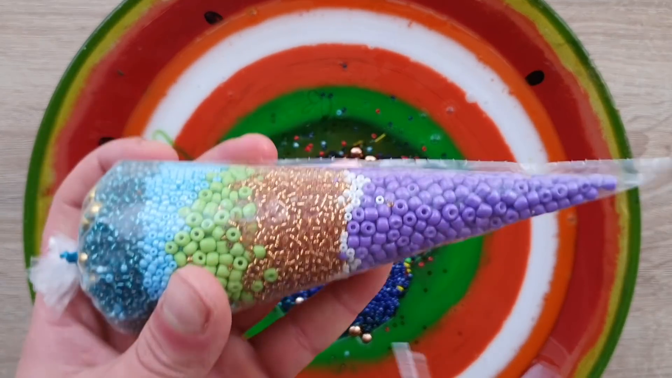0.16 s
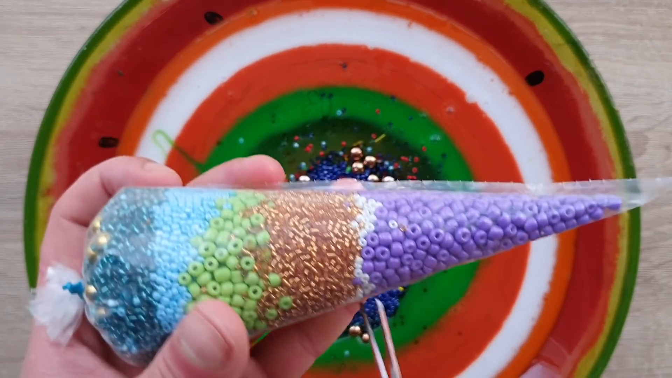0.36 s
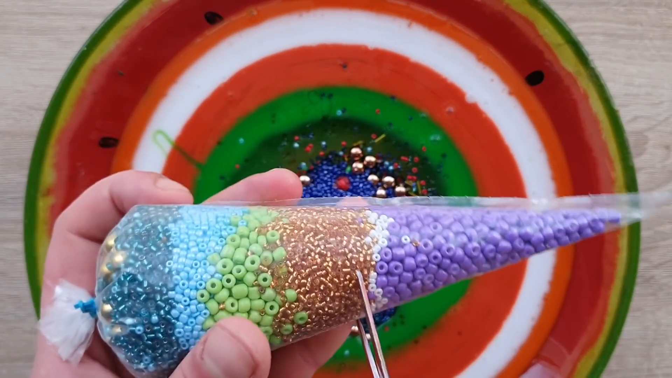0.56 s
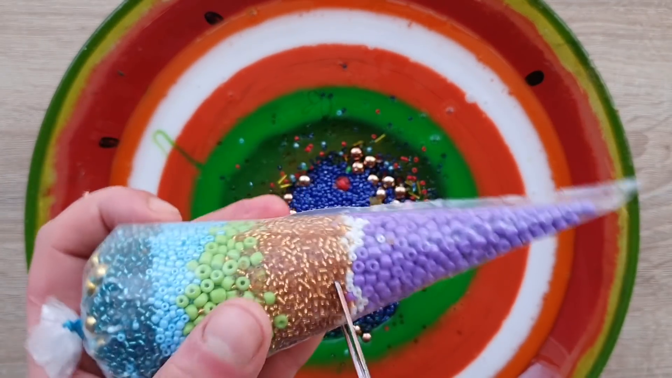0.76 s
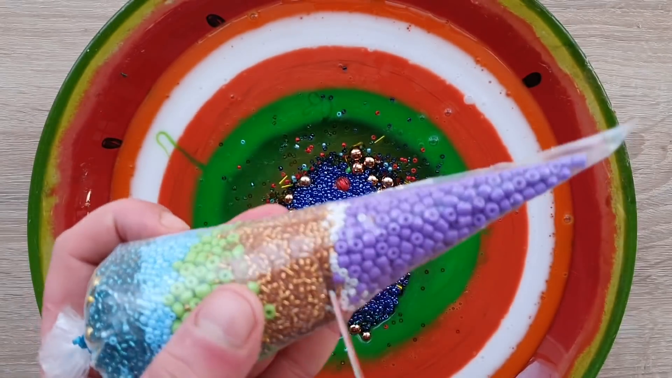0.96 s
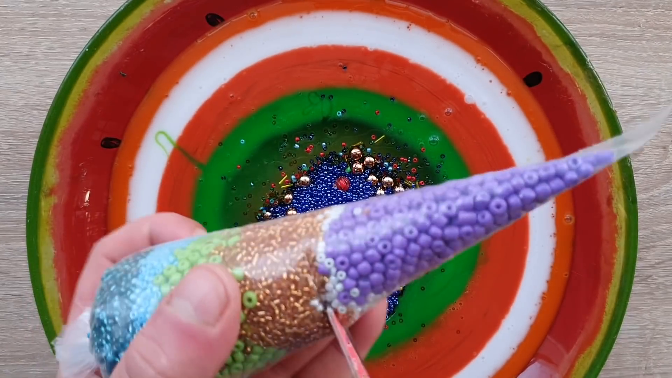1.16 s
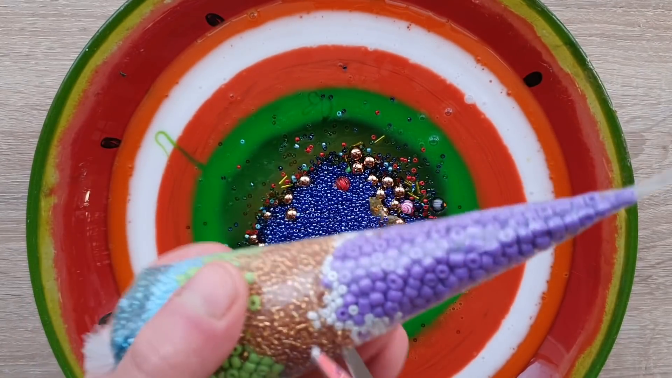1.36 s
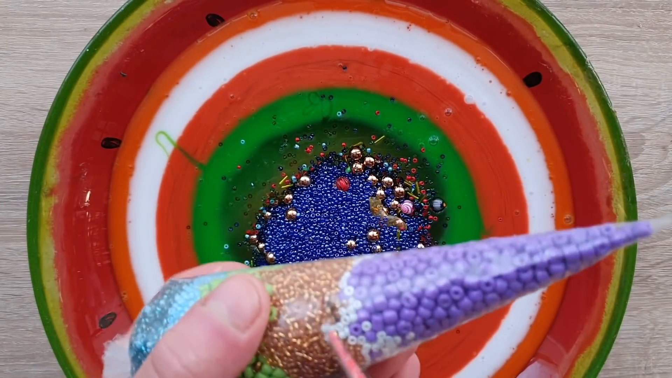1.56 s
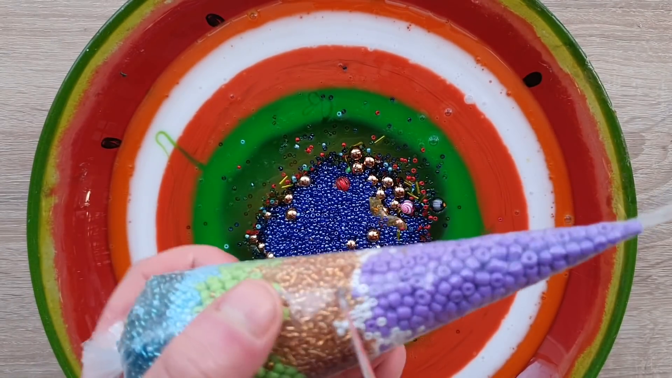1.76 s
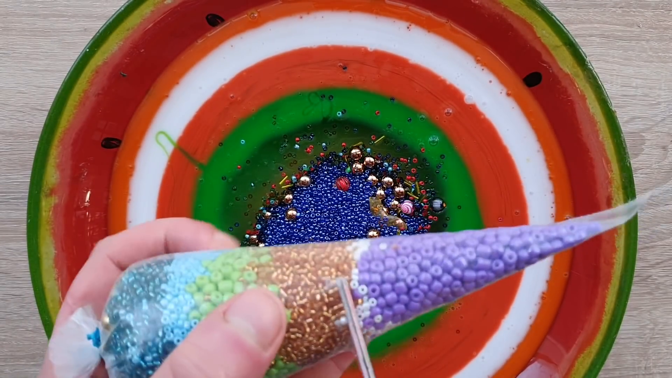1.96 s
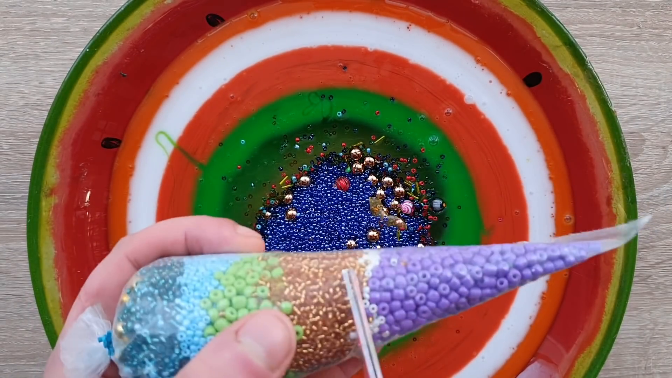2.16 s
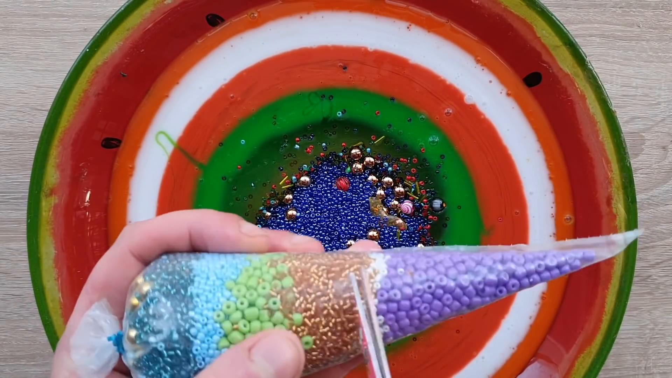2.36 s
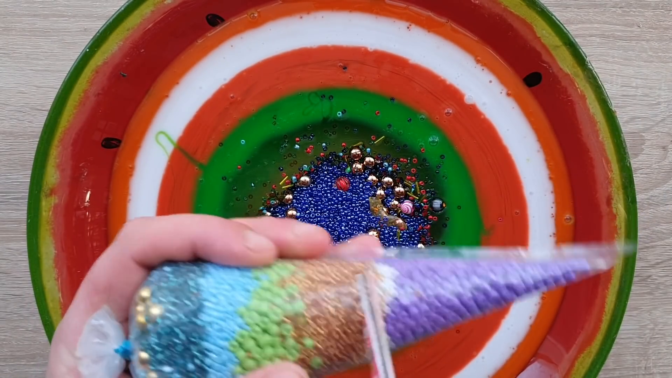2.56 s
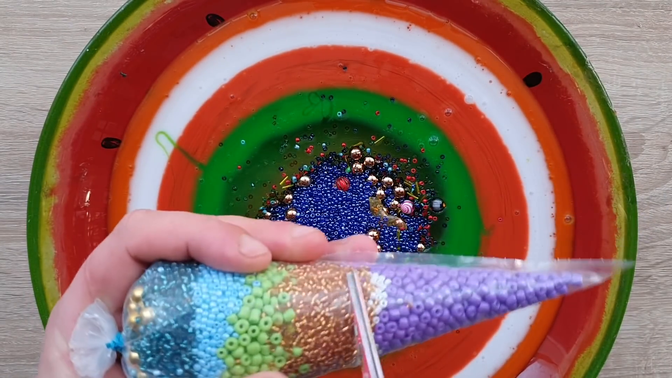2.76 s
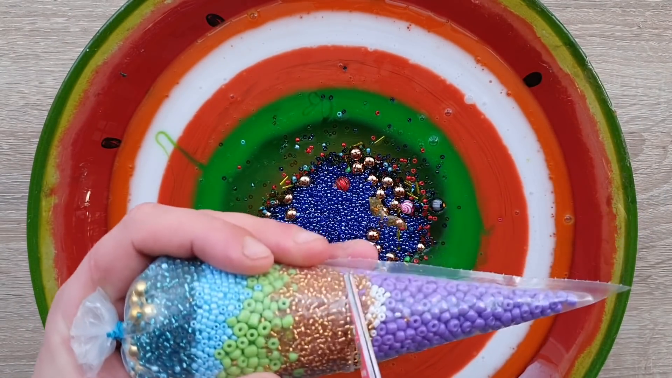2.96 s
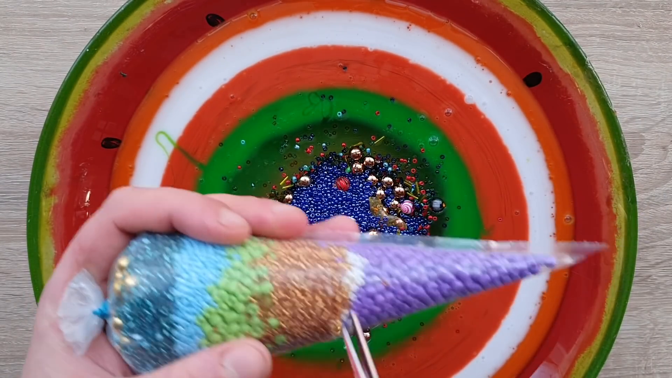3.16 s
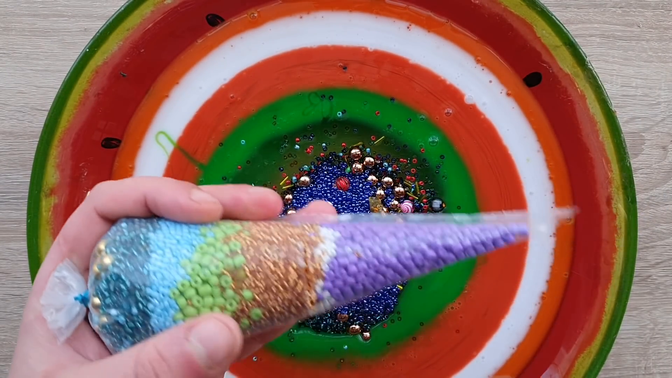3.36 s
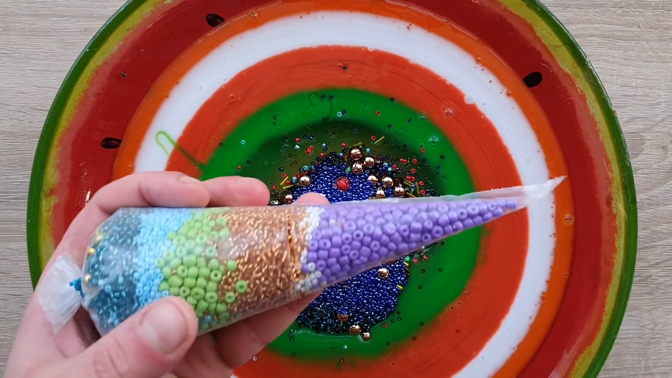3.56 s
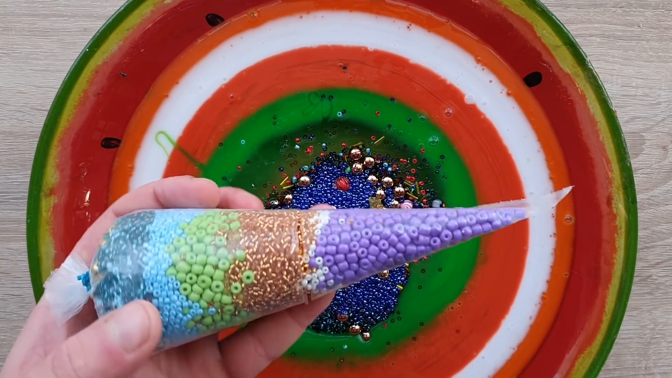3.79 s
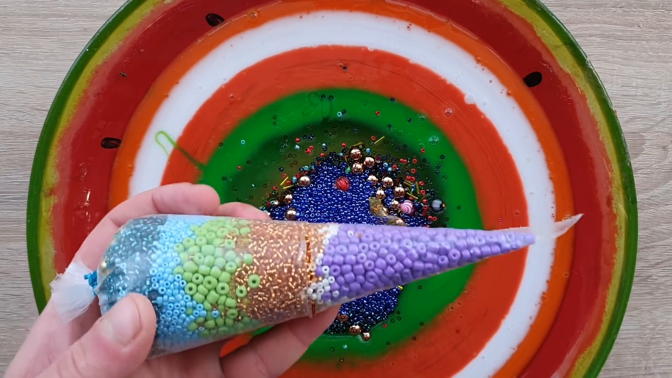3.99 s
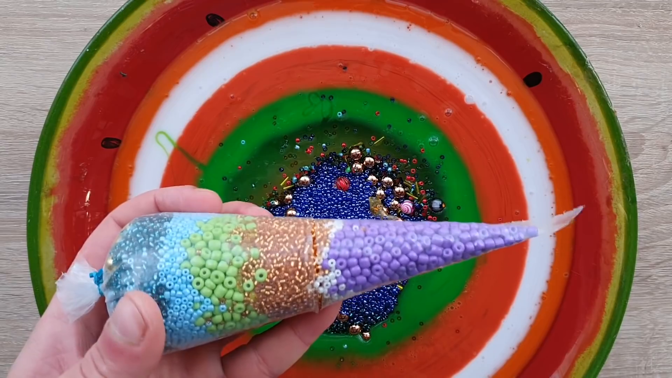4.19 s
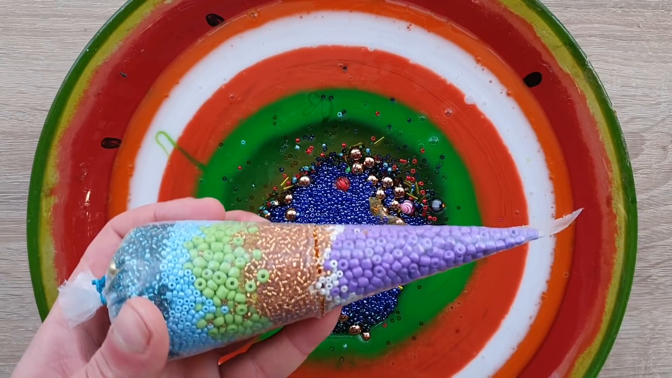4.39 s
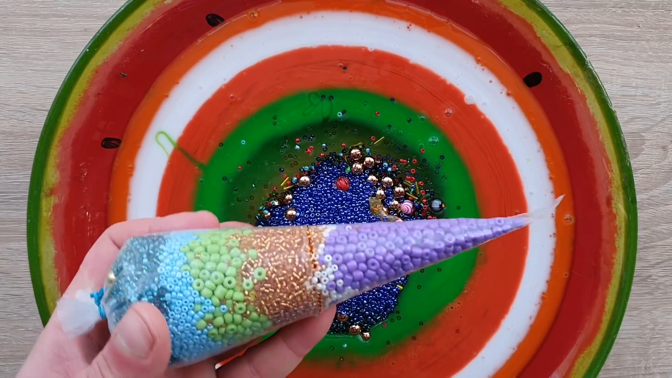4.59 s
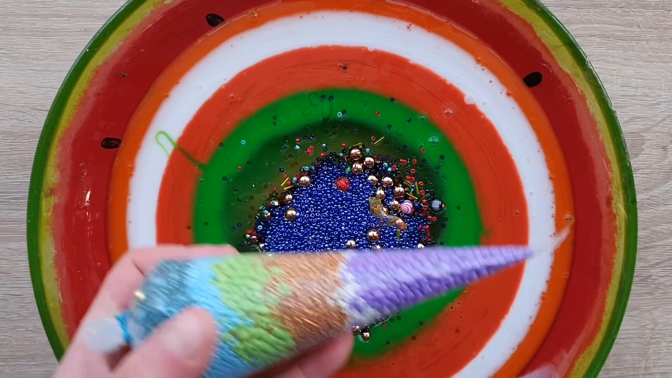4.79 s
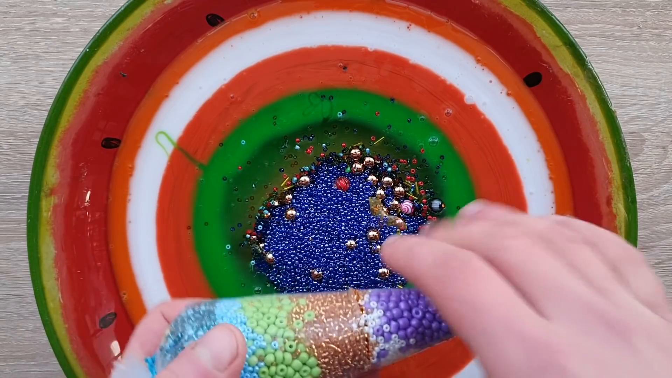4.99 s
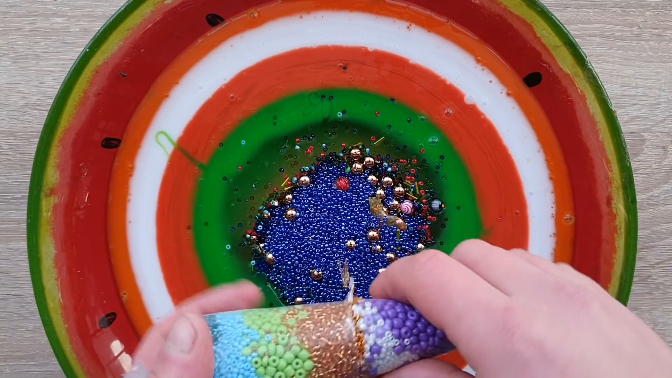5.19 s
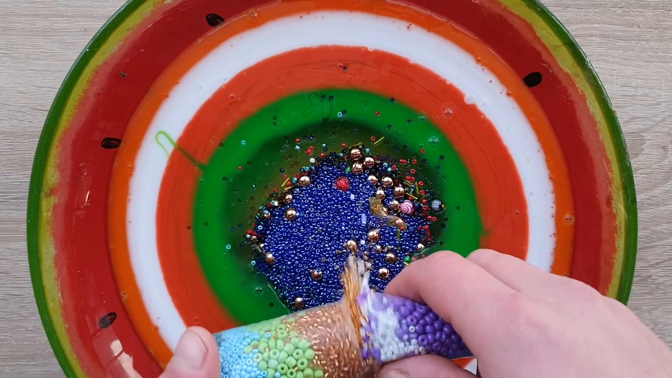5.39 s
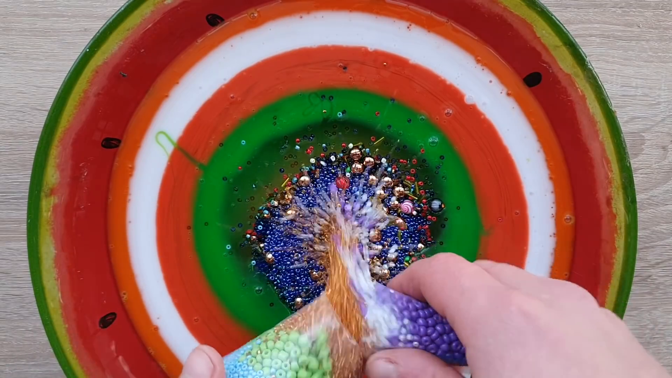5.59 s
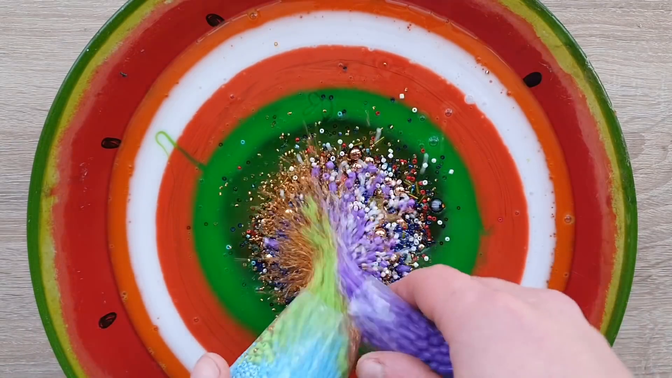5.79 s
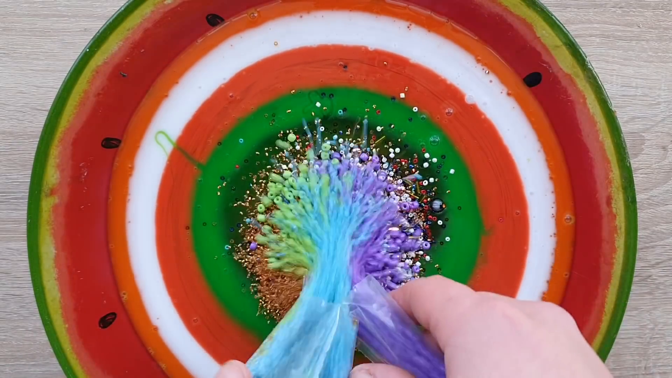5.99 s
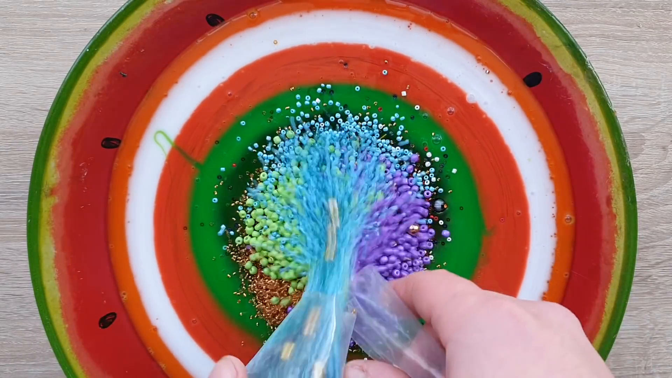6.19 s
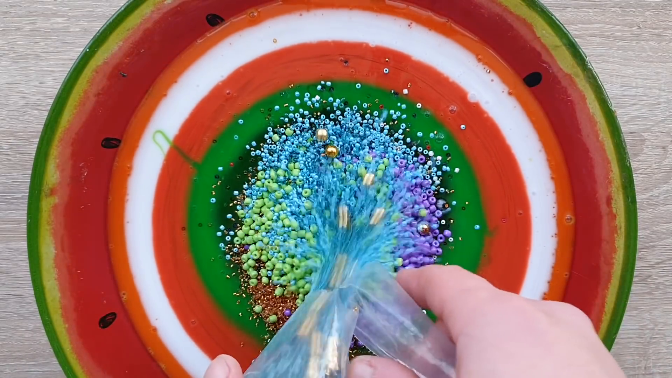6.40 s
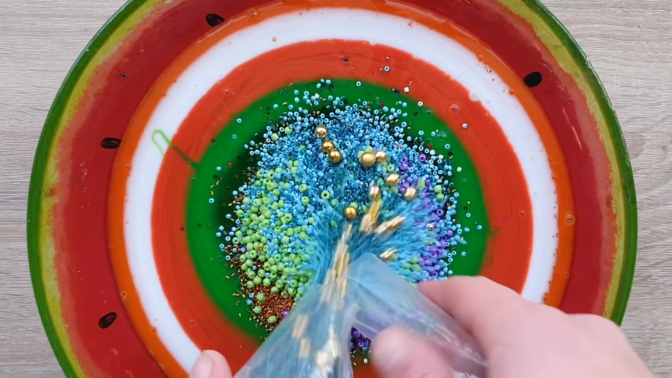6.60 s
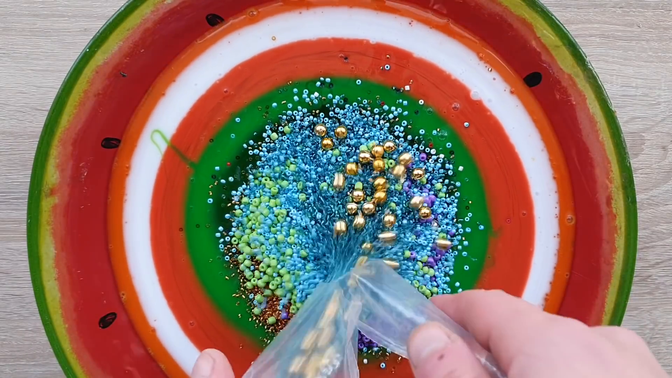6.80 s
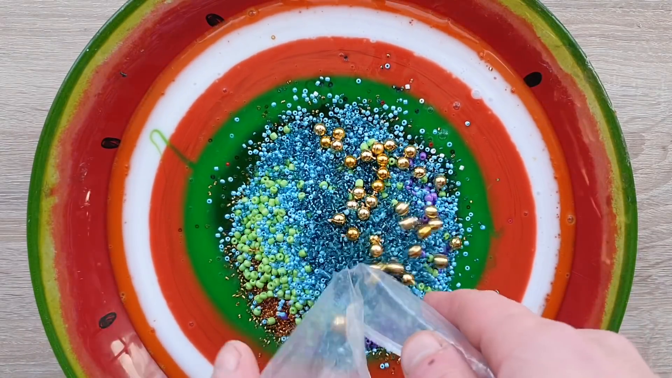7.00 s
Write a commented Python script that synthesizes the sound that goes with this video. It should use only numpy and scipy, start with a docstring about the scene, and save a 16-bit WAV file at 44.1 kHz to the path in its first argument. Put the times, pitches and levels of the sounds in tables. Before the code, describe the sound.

A close, dry stereo scene in a small quiet room, with faint hiss and soft low rumble from moving hands. At first there are barely audible crinkles of plastic. From about 0.65 to 3.4 seconds, small scissors snip a taut bag of beads in irregular short strokes: tiny tearing crackles, sharp snaps, a little blade ring and soft finger rubs, strongest around 0.9 seconds. After a pause, at 4.0 seconds the steel tips clack brightly on a wooden table, with a low thump; the handles settle with duller knocks between 4.2 and 4.5. Fingers slide softly over film near 5. From 5.2 beads trickle softly onto slime, then surge with a loud snap at 5.55 into a dense hiss and patter, peaking near 5.85 with small clinks. The stream gradually thins; from about 6.2, large pearls add dull rounded knocks, bunching near 6.75 and ending around 7 seconds.

```python
"""Cutting open a bag of beads

Small scissors snip along a plastic cone bag packed with beads, then are laid on a wooden table. Beads pour
onto slime in a bowl: a hiss and a patter on the growing heap, then the duller knocks of large pearls.
Film and beads are showers of filtered noise bursts and short rings; the scissors and table are struck modes.
A faint hiss, a low rumble, a wall echo and a diffuse tail place it all in a small room, close by."""
import sys
import numpy as np
from scipy import signal
from scipy.fft import rfft, irfft
from scipy.io import wavfile
from scipy.ndimage import uniform_filter1d

SR = 44100
rng = np.random.default_rng(int(sys.argv[2]) if len(sys.argv) > 2 else 0)


def wrap_up_sound(samples):
    """Save the sound to the file named by the first command line argument, as 16-bit audio."""
    columns = np.atleast_2d(samples).T
    # keep every value between -1 and 1, then stretch to whole-number steps
    tamed = np.clip(columns, -1, 1)
    steps = np.round(tamed * 32767).astype(np.int16)
    wavfile.write(sys.argv[1], SR, steps)


N = 310905

# how alike the two microphones hear a sound: f/Hz, left-right correlation
LIKENESS = [(60, 0.9), (600, 0.8), (1200, 0.66), (2500, 0.36), (5000, 0.13), (10000, 0.031)]
# strokes of the blades through the film: t/s, length/s, mid-stroke level/dB, swell from start to end/dB,
# resonance of the packed bag/dB, ring of the blades/dB
CUTS = [(0.657, 0.16, -68, 9, 2.5, 7.5), (0.737, 0.024, -60, -5, 11, -1),
        (0.855, 0.024, -58.5, -16, 7.5, 5), (0.879, 0.062, -49.5, -17.5, 12, -2),
        (0.942, 0.18, -59, -7, 11.5, 9.5), (1.196, 0.19, -58, 6, 3, -0.5),
        (1.468, 0.087, -61.5, -2, 6.5, 7), (1.616, 0.052, -61, -7.5, 0, 0), (1.695, 0.13, -67, 3, -1, -3),
        (1.9, 0.066, -54.5, -8.5, 7, 5), (2.175, 0.057, -66, 4, 2, 3), (2.276, 0.019, -56.5, -3, -0.5, 2.5),
        (2.428, .055, -51.5, -10.5, 0, 9.5), (2.513, 0.064, -63, 8, 3, 4), (2.66, 0.092, -65, -3.5, -5, 11),
        (2.771, 0.019, -57, 0, -2.5, 6.5), (2.941, 0.077, -58.5, 3.5, -15, 4.5),
        (3.335, 0.081, -70, -5, -7, -13)]
# strength of the stream leaving the bag, before the make-up gain in pour(): t/s, level/dB
FLOW = [(5.0, -95), (5.29, -57), (5.43, -47.5), (5.6, -45.5), (5.84, -37.5), (6.12, -41.5), (6.5, -46),
        (6.85, -49.5), (7.05, -60.5)]
HEAP_FROM_S, HEAP_BUILT_S = 5.21, 5.715  # the first beads land softly in slime, later ones on other beads


def amp(db):
    """Decibels to gain."""
    return 10 ** (np.asarray(db) / 20)


def read(points, hz):
    """Reads a spectrum table on a log-frequency axis."""
    f, value = np.transpose(points)
    return np.interp(np.log(hz + 1), np.log(np.abs(f) + 1), value)


def follow(rows):
    """Turns a curve of (t/s, level/dB) into a gain for every sample."""
    return amp(np.interp(np.arange(N) / SR, *np.transpose(rows)))


def envelope(s, length, attack_s, release_s):
    """A gain that rises at time s, holds, and dies away after the length."""
    t = np.arange(N) / SR - s
    return np.clip(t / attack_s, 0, 1) * np.exp(-np.maximum(t - length, 0) / release_s)


def add(mix, s, sound):
    """Mixes a sound in at time s."""
    part = mix[:, max(round(s * SR), 0):][:, :sound.shape[-1]]
    part += sound[..., :part.shape[1]]


def unit(x):
    """Scales a stereo sound so that its middle has energy 1."""
    return x / np.sqrt(np.sum(x.mean(0) ** 2) + 1e-20)


def blow(x, db):
    """Gives a short sound the energy of 3 ms at this level."""
    return unit(x) * amp(db) * np.sqrt(.003 * SR)


def lean(x, left_db):
    """Moves a sound to the left; one that is equal in both channels keeps its middle level."""
    gains = amp([[left_db / 2], [-left_db / 2]])
    return x * gains / gains.mean()


def colour(x, points, size=2048):
    """Causal (minimum-phase) filter with the given spectrum."""
    log_gain = np.log(amp(read(points, abs(np.fft.fftfreq(size, 1 / SR)))))
    taps = np.fft.ifft(np.exp(np.conj(signal.hilbert(log_gain)))).real
    return signal.oaconvolve(x, taps[None, :size // 2], axes=1)[:, :x.shape[1]]


def band(x, hz, width_hz):
    """The part of a sound that one resonance passes."""
    return signal.lfilter(*signal.iirpeak(hz, hz / width_hz, fs=SR), x)


def pair_noise(size):
    """White noise at two microphones: alike in the bass, unrelated in the treble, the left a little early."""
    a, b = rfft(rng.standard_normal((2, size)))
    hz = np.fft.rfftfreq(size, 1 / SR)
    same = np.clip(read(LIKENESS, hz), -1, 1)
    lag = np.exp(-2j * np.pi * hz * 2.5 / SR)  # 2.5 samples
    right = same * lag * a + np.sqrt(1 - same ** 2) * b
    return irfft(np.array([a, right]), size)


def tick(fade_s, size=1024):
    """One contact: a noise burst that fades exponentially."""
    return unit(pair_noise(size) * np.exp(-np.arange(size) / SR / fade_s))


def ring(hz, fade_s, size=1024):
    """One damped resonance that builds up within a cycle, reaching the right microphone 2 samples later."""
    t = np.arange(size) / SR
    late = np.maximum(t - np.array([[0], [2 / SR]]), 0)
    build = 1 - np.exp(-(2 * hz * late) ** 2)
    return unit(np.sin(2 * np.pi * hz * late) * np.exp(-late / fade_s) * build)


def grains(per_s, spread_db, fade_s, points, count=20):
    """A shower of contacts of uneven size, from count different places, at rms 1."""
    size = amp(spread_db * np.minimum(rng.exponential(1, N), 4)) * rng.choice([-1, 1], N)
    # dividing by the root of the rate keeps the level even while the density changes
    clicks = size * (rng.random(N) < per_s / SR) / np.sqrt(per_s)
    place = rng.integers(0, count, N)
    shower = np.zeros((2, N))
    for k in range(count):
        here = (clicks * (place == k))[None]
        shower += signal.oaconvolve(here, tick(fade_s, size=512), axes=1)[:, :N]
    return unit(colour(shower, points)) * np.sqrt(N)


def modes(table, size=20000):
    """The ring of a struck object; each blow finds slightly different mode strengths and pitches."""
    detune = 0.0091  # each contact loads the object differently and shifts its modes by about this share
    t = np.arange(size) / SR
    out = np.zeros((2, size))
    for hz, db, t60 in table:
        # a phase gap between the channels gives each mode its left-right correlation
        gap = np.arccos(np.clip(read(LIKENESS, hz), -1, 1)) * rng.choice([-1, 1])
        phase = gap * np.array([[-.5], [.5]])
        shifted = hz * (1 + detune * rng.standard_normal())
        decay = amp(db + 1.5 * rng.standard_normal() - 60 * t / t60)
        out += decay * np.sin(2 * np.pi * shifted * t + phase)
    return unit(out)


def background():
    """Faint steady hiss, and a low rumble that rises when the hands move and as the bowl fills."""
    # spectra of the hiss, the rumble and the deep boom: f/Hz, level/dB
    hiss_colour = [(120, -20), (200, -9.5), (450, -12.5), (1000, -17.5), (2200, -17), (3500, -19.5),
                   (5000, -21.5), (6600, -13.5), (7500, -24.5), (12000, -24.5), (16000, -39)]
    rumble_colour = [(15, -20), (30, -4.5), (52, -4.5), (66, 7), (82, -11), (98, 0), (115, -6),
                     (170, -17.5), (300, -32.5), (800, -63)]
    boom_colour = [(15, -27), (30, -14), (44, -4), (52, 2.5), (60, -6), (80, -15), (200, -46), (800, -83.5)]
    # movements of the hands: t/s, length/s, rumble level/dB, deep boom level/dB
    handling = [(-.1, 0.63, -68, -66.5), (0.844, 0.1, -62.5, -61.5), (1.266, 0.067, -61.5, -59.5),
                (2.128, 0.61, -65, -61.5), (2.745, 2.05, -68.5, -74.5), (3.938, 0.16, -59, -74)]
    hiss_db, resting_db, pour_db = -83.5, -76.5, -54.5
    pour_from_s, pour_rise_s = 4.98, 1

    hiss = unit(colour(pair_noise(N), hiss_colour)) * amp(hiss_db)
    filling = amp(pour_db) * np.clip((np.arange(N) / SR - pour_from_s) / pour_rise_s, 0, 1)
    level, deep = np.hypot(amp(resting_db), filling), 0
    for s, length, db, boom_db in handling:
        move = envelope(s, length, attack_s=0.15, release_s=0.079)
        level = np.hypot(level, amp(db) * move)
        deep = np.hypot(deep, amp(boom_db) * move)
    rumble = unit(colour(pair_noise(N), rumble_colour, size=16384)) * level
    boom = unit(colour(pair_noise(N), boom_colour, size=16384)) * deep
    return (lean(hiss, left_db=2.5) + rumble + lean(boom, left_db=5.5)) * np.sqrt(N)


def snap(db, hz, ring_db):
    """Taut film gives way or a bead jumps: a crack and a brief ring; the stronger the ring, the shorter the crack."""
    # spectrum of the crack: f/Hz, level/dB
    crack_colour = [(200, -21), (450, -26), (700, -11), (1100, -11), (1600, -4), (3500, -1), (7000, 4),
                    (8000, -0.5), (16000, -5.5)]
    crack = unit(colour(tick(fade_s=0.0065 / (1 + 2 * amp(ring_db))), crack_colour))
    return blow(crack + amp(ring_db) * ring(hz, fade_s=3 / hz), db)


def snaps():
    """Loud snaps, smaller ones scattered through every stroke, and faint crinkles under the grip."""
    # the loudest snaps of film and beads: t/s, level over 3 ms/dB, ring f/Hz, ring over crack/dB
    loud_snaps = [(0.17, -79, 4320, 1), (0.395, -72, 3060, -15), (0.5997, -63, 6100, -6),
                  (0.668, -71, 6940, -4), (0.7382, -55, 4730, 0), (0.753, -47, 3140, -12),
                  (.858, -48, 1520, -0.5), (0.8812, -45.5, 3240, -6), (0.9, -34.5, 3370, -18),
                  (0.9382, -34.5, 3360, -11.5), (0.979, -46.5, 3200, -31), (1.0183, -44.5, 6400, -7),
                  (1.0391, -44, 3050, -14), (1.2783, -49.5, 3080, -2), (1.379, -50.5, 3020, 10),
                  (1.4682, -41, 3250, 4.5), (1.4875, -45, 6600, -18), (1.5135, -48, 3210, -18),
                  (1.7671, -49, 6700, -23), (1.811, -51.5, 6740, -9), (1.931, -53, 3466, -1),
                  (1.9624, -49, 2300, -5), (2.183, -49, 6500, -11), (2.2764, -51, 6400, 1),
                  (2.335, -56, 7110, -2), (2.442, -48.5, 6360, -28), (2.5088, -48.5, 6300, -19),
                  (2.5798, -48.5, 6000, -11), (2.6775, -45.5, 7060, -0.5), (2.775, -49.5, 6550, -6),
                  (2.946, -54.5, 6440, 2), (3.24, -71, 7100, -11), (3.3568, -45.5, 5540, -10),
                  (5.16, -58.5, 6700, -11), (5.2016, -55.5, 9200, 4), (5.5477, -24, 3450, -4.5),
                  (5.7844, -30.5, 5840, 6), (5.98, -31, 3400, 0), (6.009, -25, 3420, 4),
                  (6.156, -32.5, 3460, 2), (6.8548, -37.5, 2820, 3.5), (6.9008, -38, 3470, -1)]
    small_per_s, small_db = 30, 0.5  # during a stroke; level over that of the stroke
    crinkles_per_s, loudest_crinkle_db, held_until_s = 5, -86, 2.6  # while the bag is gripped for cutting

    out = np.zeros((2, N))
    for s, db, hz, ring_db in loud_snaps:
        add(out, s, snap(db, hz, ring_db))
    for s, length, db, swell_db, _, _ in CUTS:
        for when, pitch in rng.random((round(small_per_s * length), 2)):
            level_db = db + swell_db * (when - .5) + small_db
            add(out, s + when * length, snap(level_db, hz=3300 * 2 ** pitch, ring_db=-10.5))
    for when, pitch, size in rng.random((round(crinkles_per_s * held_until_s), 3)):
        crinkle = snap(loudest_crinkle_db - 10 * size, hz=3300 * 2 ** pitch, ring_db=-11.5)
        add(out, when * held_until_s, crinkle)
    return lean(out, left_db=5.0)


def rubbing():
    """Fingers slide over the film: a dense shower of contacts makes a soft hiss that swells and fades."""
    # slides of the fingers: t/s, length/s, peak level/dB
    rubs = [(0.516, 0.093, -76.5), (1.1, 0.14, -71.5), (1.988, 0.1, -69.5), (2.124, 0.066, -74.5),
            (2.33, 0.08, -77), (3.707, .14, -81), (4.873, 0.45, -72)]
    # spectrum of the sliding: f/Hz, level/dB
    rub_colour = [(300, -20), (1500, -9), (2600, -10), (4200, -0.5), (5500, 1.5), (6500, 5.5), (7800, -1.5),
                  (16000, -13.5)]
    t = np.arange(N) / SR
    pressure = np.zeros(N)
    for s, length, db in rubs:
        pressure += amp(db) * np.sin(np.pi * np.clip((t - s) / length, 0, 1))
    slide = grains(per_s=21000, spread_db=6.5, fade_s=0.00067, points=rub_colour)
    return lean(slide * pressure, left_db=7.5)


def cutting():
    """Each push of the blades tears the film in an uneven run of tiny crackles."""
    # spectrum of the tearing film: f/Hz, level/dB
    film_colour = [(150, -12.5), (430, -20.5), (650, -11), (1150, -14.5), (1600, -6), (2600, -2.5),
                   (3200, 0), (4700, -2), (6700, 1), (7700, -6), (10000, -3), (16000, -7.5)]
    attack_s, release_s = 0.0074, 0.0064
    approach_s, approach_db = 0.027, -15.5  # the blades graze the film just before they bite

    t, push = np.arange(N) / SR, np.zeros(N)  # push sums the strokes as power
    for s, length, db, swell_db, _, _ in CUTS:
        progress = np.clip((t - s) / length, 0, 1)
        graze = amp(approach_db) * envelope(s - approach_s, approach_s, approach_s, attack_s)
        bite = envelope(s, length, attack_s, release_s)
        push += (amp(db + swell_db * (progress - .5)) * (graze + bite)) ** 2
    slip = uniform_filter1d(rng.standard_normal(N), 300)  # the blades catch and slip every few milliseconds
    stick = amp(2.6 * slip / slip.std())
    crackle = grains(per_s=2200, spread_db=2.8, fade_s=.0007, points=film_colour)
    return lean(crackle * np.sqrt(push) * stick, left_db=3.5)


def bag():
    """A deep bite wakes the packed beads behind the film; a shallow one leaves the blades ringing."""
    x = cutting() + snaps()
    # resonance gains glide from the middle of one stroke to the next
    packed = follow([(s + length / 2, bag_db) for s, length, _, _, bag_db, _ in CUTS])
    ringing = follow([(s + length / 2, ring_db) for s, length, _, _, _, ring_db in CUTS])
    body = band(band(x, hz=720, width_hz=2700), hz=695, width_hz=1700)
    body += 0.5 * band(x, hz=3250, width_hz=540)
    body += .7 * band(x, hz=190, width_hz=200)
    blades = 1.3 * band(x, hz=1660, width_hz=130)
    blades += 1.3 * band(x, hz=980, width_hz=80)
    blades += .7 * band(x, hz=2590, width_hz=130)
    return x + (packed - 1) * body + (ringing - 1) * blades + rubbing()


def scissors():
    """The steel tips chatter on the table and ring; then the handles drop flat with duller, wooden knocks."""
    # the scissors meet the table: t/s, steel level before a 4 dB cut/dB, hardness (treble limit) f/Hz,
    # wooden knock level/dB, its pitch f/Hz, table thump level before a 3 dB lift/dB,
    # chatter fade/s, longest ring t60/s
    knocks = [(3.9779, -32, 8500, -54, 860, -51, 0.0012, .3),
              (3.9947, -33.5, 8400, -50, 860, -46, 0.0022, 0.58),
              (4.02, -41, 6000, -58, 860, -48.5, 0.023, 0.14),
              (4.056, -42, 5500, -57, 860, -56, .0078, 0.12),
              (4.2383, -54, 1300, -48.5, 1010, -91, .0035, .2),
              (4.275, -58, 1400, -61, 980, -91, .012, .15), (4.302, -65, 1000, -55, 910, -85, .009, .04),
              (4.34, -74, 800, -61, 800, -86, .006, .04), (4.399, -51, 1100, -45.5, 850, -71, 0.0044, .02),
              (4.405, -49, 4000, -45, 845, -60, .008, .012),
              (4.4594, -47, 2820, -39.5, 858, -64, .004, .012)]
    # resonances of the scissors, then of the table top: f/Hz, level/dB, t60/s
    scissor_modes = [(890, -7, 0.1), (1050, -3, .5), (1230, -9, 0.056), (2030, 0, 0.092), (2203, 1.5, .1),
                     (2400, -10, 0.037), (3190, -1, 0.2), (3270, 0, .22), (3390, 2, .06), (4630, 4, 0.0093),
                     (4900, -2, 0.07), (5330, 3, .03), (6600, 16.5, 0.016)]
    table_modes = [(72, -28, 0.54), (119.7, 0.5, 0.15), (197, 2, 0.13), (234, 0, 0.15), (367, -5.5, 0.12)]
    # spectrum of the scraping steel: f/Hz, level/dB
    clatter_colour = [(150, -12), (450, -25), (600, -18.5), (850, 10), (1250, 1), (1600, -14), (2200, 5.5),
                      (2800, -9.5), (3400, 5.5), (4100, -10), (4800, 4), (6000, -8.5), (7000, -2.5),
                      (16000, -10.5)]
    # spectrum of a wooden knock: multiple of its pitch, level/dB
    wood_colour = [(.2, -15), (.55, -12), (.72, -12), (1, 1.5), (1.16, -7), (1.32, -6), (1.7, -15),
                   (2.2, -16), (2.45, -9), (2.85, -19), (3.7, -19), (4.9, -33), (18, -60)]

    out = np.zeros((2, N))
    t = np.arange(4000) / SR
    for s, db, hard_hz, wood_db, wood_hz, thump_db, chatter_s, longest_s in knocks:
        contacts = rng.standard_normal(len(t)) * (rng.random(len(t)) < .1) * np.exp(-t / chatter_s)
        steel = modes([(hz, mode_db, min(t60, longest_s)) for hz, mode_db, t60 in scissor_modes])
        ringing = unit(signal.oaconvolve(steel, contacts[None], axes=1)[:, :20000])
        scrape = unit(colour(tick(fade_s=chatter_s, size=20000), clatter_colour))
        soften = signal.butter(2, min(hard_hz, SR / 3), fs=SR)  # a soft contact leaves out the treble
        clatter = signal.lfilter(*soften, ringing + amp(5.5) * scrape)
        add(out, s, blow(clatter, db - 4.0))
        wood = [(wood_hz * multiple, part_db) for multiple, part_db in wood_colour]
        add(out, s, blow(colour(tick(fade_s=chatter_s, size=4096), wood), wood_db))
        add(out, s, blow(modes(table_modes), thump_db + 3))
    return lean(out, left_db=1.5)


def landing():
    """Strength of the patter: it follows the stream, and grows as the heap builds and the beads get larger."""
    bare_slime_db = -21.5
    coarser_db_per_s = 3  # larger beads: more patter for the same hiss
    t = np.arange(N) / SR
    bare = np.maximum((HEAP_BUILT_S - t) / (HEAP_BUILT_S - HEAP_FROM_S), 0)
    coarser = np.maximum(t - HEAP_BUILT_S, 0)
    return follow(FLOW) * amp(bare_slime_db * bare + coarser_db_per_s * coarser)


def pour():
    """Beads hiss out of the bag and patter on the heap; a stronger stream holds more of them."""
    # spectra of beads sliding out and of beads landing: f/Hz, level/dB
    slide_colour = [(160, -40), (400, -18), (700, -22), (1500, -5), (2800, 0.5), (4700, -0.5), (6700, 1),
                    (7500, -2), (11000, 0), (16000, -1)]
    heap_colour = [(100, -29), (200, -14.5), (400, -8), (520, -10.5), (680, 5.5), (880, 3), (1200, -0.5),
                   (1600, 3.5), (2100, -0.5), (2600, 3), (3000, -2.5), (3500, 3), (4400, -4.5),
                   (6400, -3.5), (7800, -17.5), (16000, -40)]
    t = np.arange(N) / SR
    slide = follow(FLOW)
    flow = slide / slide.max()
    opened = t > FLOW[0][0]
    # the slit gapes wider
    spill = np.clip((t - HEAP_FROM_S) / (HEAP_BUILT_S - HEAP_FROM_S), 0, 1) ** 3
    hiss_per_s = 2500 + 7000 * spill + 3000 * flow
    hiss = grains(hiss_per_s, spread_db=2.8, fade_s=.0005, points=slide_colour)
    patter = grains(per_s=1000 + 4000 * flow, spread_db=2.8, fade_s=.0012, points=heap_colour)
    sliding = lean(hiss * slide * amp(2.5), left_db=5.0)
    falling = lean(patter * landing() * amp(2.5), left_db=3.0)
    return opened * (sliding + falling)


def clinks():
    """Here and there two beads of the stream strike squarely, each pair ringing at its own pitch."""
    out, land = np.zeros((2, N)), landing()
    for when, pitch, size in rng.random((420, 3)):
        s, hz = 5.3 + 1.3 * when, 1800 * 4 ** pitch
        clink = blow(ring(hz, fade_s=.001), -10 * np.sqrt(size))
        add(out, s, clink * land[int(s * SR)])
    return lean(out * amp(-3.0), left_db=7.0)


def pearls():
    """Large pearls join the stream late and drop into the heap, which damps them at once."""
    # single pearls landing hard: t/s, level over 3 ms/dB, ring f/Hz
    hard_landings = [(6.175, -33, 1660), (6.5411, -27, 1540), (6.57, -34, 1430), (6.707, -39, 1500),
                     (6.752, -32, 1560), (6.763, -38, 1500), (6.7782, -32, 1040), (6.81, -40, 1080),
                     (6.856, -33.5, 1640), (6.882, -35, 1460), (6.9685, -30.5, 1620), (7.0033, -28.5, 1170),
                     (7.042, -35, 1390)]
    # spectrum of a pearl's knock: f/Hz, level/dB
    pearl_colour = [(150, -13.5), (450, -10.5), (750, -7.5), (1030, 4.5), (1280, -4), (1550, 4.5),
                    (1750, 4.5), (2100, -5.5), (3100, -11), (3480, -4), (3900, -22), (16000, -45)]
    from_s, until_s = 5.63, 6.87
    stream = amp(-43) * envelope(from_s, until_s - from_s, attack_s=0.64, release_s=0.021)
    # the last pearls tumble out together
    clump = amp(-36.5) * envelope(6.745, length=0.037, attack_s=0.0042, release_s=0.031)
    tumble = grains(per_s=400, spread_db=2.2, fade_s=0.0013, points=pearl_colour)
    out = tumble * np.hypot(stream, clump)
    dull = signal.butter(2, [650, 2400], "band", fs=SR)
    for s, db, hz in hard_landings:
        knock = unit(colour(tick(fade_s=0.0012), pearl_colour))
        hit = signal.lfilter(*dull, knock + ring(hz, fade_s=.0013))
        add(out, s, blow(hit, db))
    return lean(out, left_db=3.5)


def wall(x):
    """One dull early echo from a nearby wall ripples the tone of the direct sound."""
    echo = np.zeros((2, N))
    add(echo, .00684, signal.lfilter(*signal.butter(1, 3500, fs=SR), x))
    return echo


def room(x, size=26000):
    """Diffuse echoes of a small room: a noise tail whose decay time depends on frequency."""
    # decay of the room: f/Hz, t60/s
    room_t60 = [(150, 0.38), (1000, 0.22), (3500, 0.34), (8000, 0.31), (16000, 0.33)]
    hz, t, z = signal.stft(pair_noise(size), SR, nperseg=256)
    tail = signal.istft(z * amp(-60 * t / read(room_t60, hz)[:, None]), SR, nperseg=256)[1]
    tail *= np.clip((np.arange(tail.shape[1]) / SR - .002) / 0.00086, 0, 1)  # silent for the first 2 ms
    source = (x[0] + x[1]) / 2
    return lean(signal.oaconvolve(source[None], unit(tail), axes=1)[:, :N], left_db=2.0)


def scene():
    """All sources, each with its share of the room."""
    film, tool, beads = bag(), scissors(), pour() + clinks() + pearls()
    direct = film + tool + beads
    diffuse = room(amp(-10.0) * film + amp(-3.5) * tool + amp(-9.5) * beads)
    return direct + amp(-16.5) * wall(direct) + diffuse + background()


def record(dry):
    """The two microphone ports resonate differently, the left one near 6 kHz; then a steep treble limit."""
    # contrast of the left port to the right, before each side's share: f/Hz, level/dB
    ports = [(3900, 0), (4600, -1), (5100, 2), (5500, 3), (6300, 7), (7000, 7), (7500, -3.5), (8500, -6),
             (11000, -1), (15000, 4)]
    left = colour(dry[:1], [(hz, 0.37 * db) for hz, db in ports])
    right = colour(dry[1:], [(hz, -.7 * db) for hz, db in ports])
    treble_limit = signal.firwin(511, 15850, window=("kaiser", 9), fs=SR)
    return signal.oaconvolve(np.vstack([left, right]), treble_limit[None], "same")


dry = scene()
out = record(dry)
wrap_up_sound(out)
```